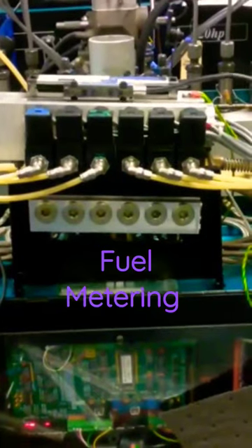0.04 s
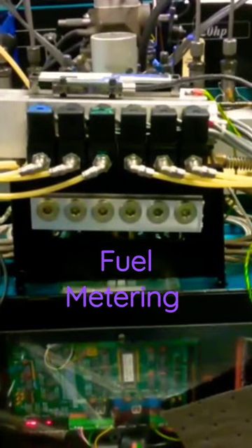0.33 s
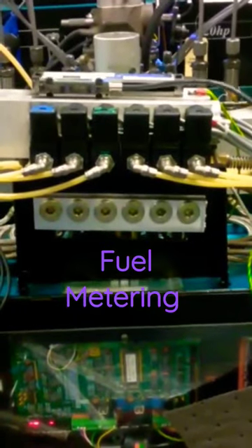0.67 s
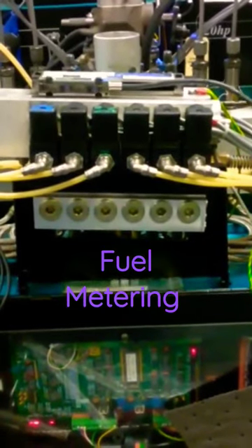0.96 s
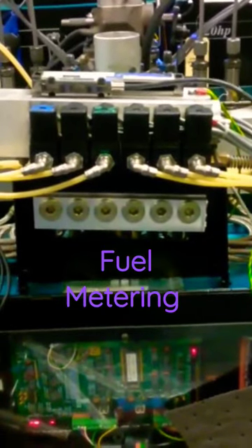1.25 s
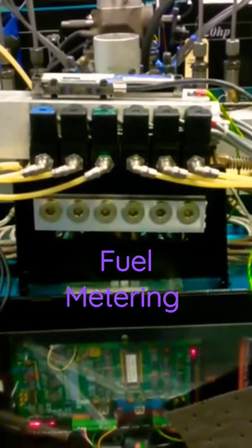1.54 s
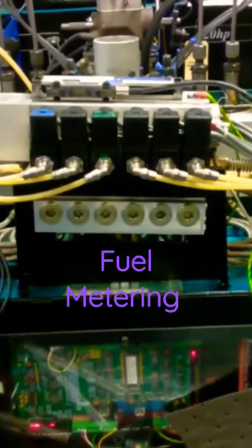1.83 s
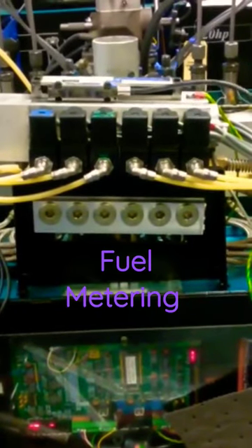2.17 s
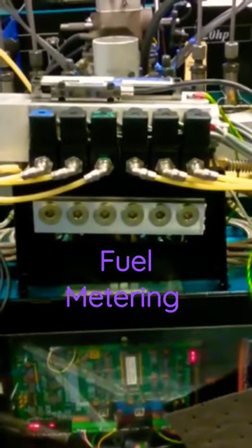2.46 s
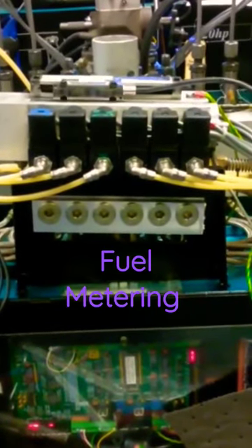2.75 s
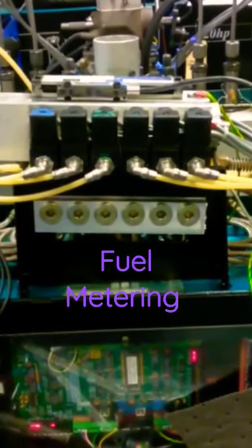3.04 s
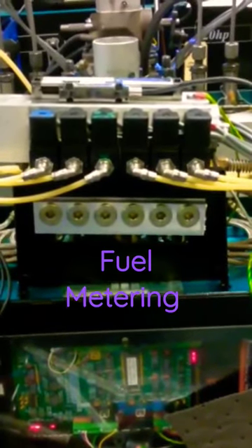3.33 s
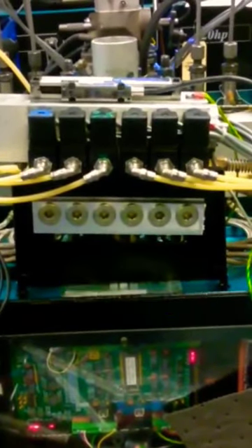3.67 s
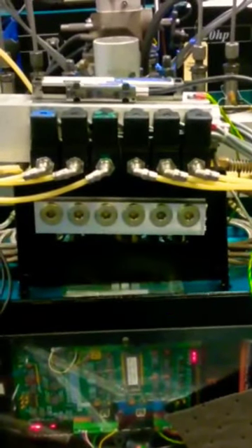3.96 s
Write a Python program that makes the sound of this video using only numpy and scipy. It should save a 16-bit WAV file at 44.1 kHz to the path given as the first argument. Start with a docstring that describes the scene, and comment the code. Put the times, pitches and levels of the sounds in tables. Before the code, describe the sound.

An engine runs at a constant speed on an indoor test stand, heard close up. Its drone carries a fast, repeating metallic clatter and a thin gear whine, over the low rush of the room.

```python
"""An engine's drone fades in, close by, at a governed 900 rpm on an indoor test stand.
Its crank orders and the whine of its gears are tones at fixed multiples of the shaft's speed.
The moving parts rattle at the same moments of every two-turn cycle, coloured by casing resonances
and a nearby reflection; play in the parts makes each cycle a little different.
Beneath lies the low rush of the test cell, and two faint, bright ticks sound over it."""
import sys
import numpy as np
from scipy import signal
from scipy.fft import rfft, irfft
from scipy.io import wavfile
from scipy.ndimage import uniform_filter1d

SR = 44100
rng = np.random.default_rng(int(sys.argv[2]) if len(sys.argv) > 2 else 0)


def store_wav(level_fs):
    """Save 16-bit WAV to argv[1]."""
    pcm = np.round(np.clip(np.atleast_2d(level_fs), -1, 1) * 32767)
    wavfile.write(sys.argv[1], SR, pcm.T.astype(np.int16))


N = 176400
T = np.arange(N) / SR
RPM = 900
CYCLE = round(SR * 120 / RPM)  # samples in one four-stroke cycle of two turns

# Partials of the drone: multiple_of_crank_speed, relative_level_db
CRANK_ORDERS = [(4, -56.5), (8, -52), (9, -53), (9.5, -49), (17, -43), (20, -42), (20.5, -41), (21, -41),
                (21.5, -45), (23, -51), (24, -33.5), (25, -46), (25.5, -51), (27.5, -50), (28.5, -44),
                (29, -41), (29.5, -47), (30, -49), (30.5, -47), (32, -49), (33, -52), (36, -52),
                (36.5, -46), (37, -51), (40, -44), (41, -52), (44.5, -54)]
# Partials of the gear whine: multiple_of_crank_speed, relative_level_db
GEAR_ORDERS = [(68, -50), (82.5, -42.5), (84, -47), (121, -46), (148, -47), (161, -47.5), (211.5, -53),
               (300.5, -48), (312.5, -46.5), (333.5, -51), (355, -48), (381.5, -48), (417, -47), (432, -48),
               (475.5, -48)]
# Rattles of the moving parts: time_in_cycle_ms, length_ms, centre_hz, width_hz, relative_strength_db
CYCLE_RATTLES = [(1, 12, 13000, 3500, 2), (3, 15, 4900, 600, 7), (6, 22, 9300, 700, 6),
                 (14, 10, 2120, 220, 7), (16, 10, 4600, 450, 8), (31, 15, 7000, 1100, 8),
                 (38, 8, 8850, 700, 6), (46, 15, 1280, 130, 7), (52, 8, 8750, 600, 4),
                 (56, 14, 2200, 170, 9), (56, 9, 3200, 400, 8), (58, 18, 4450, 600, 4),
                 (63, 8, 5600, 450, 3), (64, 10, 1060, 130, 7), (67, 10, 10600, 900, 6),
                 (72, 13, 2440, 200, 7), (79, 12, 1850, 220, 8), (80, 12, 8200, 600, 5),
                 (81, 14, 5700, 1200, 2), (91, 18, 1260, 130, 8), (98, 11, 5800, 1100, 6),
                 (99, 15, 2020, 140, 8), (101, 13, 2380, 260, 7), (101, 22, 3850, 450, 4),
                 (103, 8, 9650, 600, 4), (111, 9, 1500, 170, 9), (112, 12, 6400, 1700, 7.5),
                 (118, 11, 2390, 200, 8), (123, 12, 3250, 400, 5), (131, 10, 2210, 150, 7)]
# Spectral envelope of the repeating clatter: frequency_hz, relative_density_db
CLATTER_SPECTRUM = [(40, -35), (100, -25), (135, -4), (250, -3), (480, -2), (650, -11), (780, 0),
                    (830, -15), (950, -19), (1100, 2.5), (1250, -0.5), (1380, -2.5), (1500, 1.5),
                    (1700, -2.5), (1900, -3), (2050, 2), (2250, 0.5), (2500, -2), (2850, -5.5), (3100, -5),
                    (3500, -7), (4200, -3), (4800, -1.5), (5500, -1.5), (6300, 2.5), (7100, -1), (7900, -9),
                    (8500, -10), (9000, -8.5), (10700, -12.5), (11700, -23), (15500, -24)]
# Spectral envelope of the clatter that varies between cycles: frequency_hz, relative_density_db
LOOSE_SPECTRUM = [(700, -14), (950, -30), (1200, -4.5), (1450, -2), (1900, -11), (2200, -3.5), (2800, -5.5),
                  (3600, -7), (4600, -3), (5400, 0.5), (6300, -6), (7200, -2), (8300, -8), (9000, -2.5),
                  (9800, -3), (10700, -2.5), (11700, -12.5), (12700, -10.5), (14000, -14), (15500, -18)]
# Narrow peaks colouring the clatter, from casing resonances and the ripple of a nearby reflection:
# centre_hz, width_hz, boost_db
CLATTER_PEAKS = [(1240, 50, 4), (1815, 60, 3), (2040, 70, 3), (2220, 70, 4), (3170, 120, 4), (3450, 90, 5),
                 (3780, 90, 5), (4100, 110, 4), (4520, 50, 6), (4580, 40, 4), (4680, 45, 6), (5190, 60, 3),
                 (5340, 80, 4), (5715, 60, 4), (6075, 60, 4), (6265, 90, 6), (6478, 50, 4), (6755, 50, 4),
                 (7850, 60, 6), (8860, 80, 8), (9010, 90, 5), (10700, 130, 5), (12720, 200, 4)]
# Spectral envelope of the test cell's rush: frequency_hz, relative_density_db
CELL_SPECTRUM = [(20, -19), (42, -24), (58, -4), (72, -10), (105, -11), (135, -18), (160, 3.5), (200, -5),
                 (230, -8), (255, 4), (290, 0.5), (390, 1), (480, -4.5), (650, -9), (900, -6.5),
                 (3000, -70)]
# Ticks: start_s, relative_level_db
TICK_EVENTS = [(0.797, -26), (2.198, -34)]
# Fade-in, whose last gain holds to the end: time_s, gain_db
FADE_IN = [(0, -66), (.025, -31.5), (.05, -17.5), (.09, -7.5), (.15, -3), (.22, -2), (.3, -1.5)]


def undb(db):
    """Amplitude ratio of a level in decibels."""
    return 10 ** (np.asarray(db) / 20)


def level(x, db):
    """Signal scaled to an rms level."""
    return x * undb(db) / np.sqrt(np.mean(x ** 2))


def bell(offset, width):
    """Gaussian gain; width is the full width at half power."""
    return np.exp(-2 * np.log(2) * (offset / width) ** 2)


def spectral_gain(hz, spectrum):
    """Spectral envelope, interpolated in decibels over log frequency."""
    points_hz, db = np.array(spectrum).T
    return undb(np.interp(np.log(hz + 1), np.log(points_hz), db))


def noise(gain):
    """White noise filtered by gain(hz), at unit rms."""
    return level(irfft(rfft(rng.standard_normal(N)) * gain(np.fft.rfftfreq(N, 1 / SR)), N), 0)


def drift(corner_hz):
    """Low-pass noise: a smooth random fluctuation of unit rms."""
    return noise(lambda hz: 1 / (1 + (hz / corner_hz) ** 2) ** 2)


def swell(at_ms, length_ms):
    """One period of an envelope that rises and falls once per engine cycle."""
    cycle_ms = 1000 * CYCLE / SR
    ms = 1000 * np.arange(CYCLE) / SR
    return bell((ms - at_ms + cycle_ms / 2) % cycle_ms - cycle_ms / 2, length_ms)


def shaft_tones(orders, shaft_s, waver_db=.5):
    """Phase locking: each partial follows a multiple of the crank angle, wavering slightly in level."""
    turns = RPM / 60 * shaft_s
    out = np.zeros(N)
    for order, db in orders:
        amplitude = np.sqrt(2) * undb(db + waver_db * drift(5))
        out += amplitude * np.sin(2 * np.pi * (order * turns + rng.random()))
    return out


def crank_drone(shaft_s, even_s=.026):
    """Beating: neighbouring crank orders interfere. The strokes are even but for one heavier one."""
    partials = shaft_tones(CRANK_ORDERS, shaft_s)
    span = int(even_s * SR)
    power = uniform_filter1d(uniform_filter1d(partials ** 2, span), span // 2)
    even = partials * np.sqrt(power.mean() / power)  # only the quick beats remain
    accent_db = 2 * np.resize(swell(at_ms=102, length_ms=20), N)
    return undb(.7 + accent_db) * even


def gear_whine(shaft_s):
    """Gear meshing: teeth engage periodically, sounding high multiples of the crank speed."""
    return undb(3.5) * shaft_tones(GEAR_ORDERS, shaft_s)


def peak_gain(hz):
    """Resonance and interference: the casing and a nearby reflection add narrow peaks to the clatter."""
    return undb(sum(db * bell(hz - centre_hz, width_hz) for centre_hz, width_hz, db in CLATTER_PEAKS))


def repeating_clatter(shaft_s, scatter_db=1.5, even_ms=8.5):
    """Periodic excitation: a cycle of metallic chatter, swelling at each rattle, follows the shaft."""
    hz = np.fft.rfftfreq(CYCLE, 1 / SR)
    phases = np.exp(2j * np.pi * rng.random(len(hz)))
    contacts = phases * undb(scatter_db * rng.standard_normal(len(hz)))
    bands_hz = np.geomspace(60, 16000, 44)
    span = int(even_ms * SR / 1000)
    chatter = np.zeros(CYCLE)
    for share, band_hz in zip(np.eye(len(bands_hz)), bands_hz):
        band = np.fft.ifft(contacts * np.interp(hz, bands_hz, share), CYCLE)  # analytic signal
        power = uniform_filter1d(np.abs(band) ** 2, span, mode="wrap")
        even = band.real * np.sqrt(power.mean() / power)
        rattle_power = 1 + sum(
            (undb(db - .5) * swell(at_ms, length_ms) * bell(band_hz - centre_hz, width_hz)) ** 2
            for at_ms, length_ms, centre_hz, width_hz, db in CYCLE_RATTLES)
        chatter += even * np.sqrt(rattle_power / rattle_power.mean())
    fine = 8 * CYCLE  # oversampling keeps the treble through interpolation
    cycle = irfft(rfft(chatter) * spectral_gain(hz, CLATTER_SPECTRUM) * peak_gain(hz), fine)
    cycle_position = shaft_s * SR / CYCLE % 1
    return level(np.interp(cycle_position, np.arange(fine) / fine, cycle), -25.6)


def loose_clatter():
    """Modulated noise: with play in the parts, the rattles keep their timing but not their waveform."""
    hz = np.fft.rfftfreq(N, 1 / SR)
    chatter = rng.standard_normal(N)
    contacts = rfft(rng.standard_normal(N))
    for at_ms, length_ms, centre_hz, width_hz, db in CYCLE_RATTLES:
        band = irfft(contacts * bell(hz - centre_hz, width_hz), N)
        chatter += undb(db - .5) * np.resize(swell(at_ms, length_ms), N) * band
    coloured = irfft(rfft(chatter) * spectral_gain(hz, LOOSE_SPECTRUM) * peak_gain(hz), N)
    return level(coloured, -30.7)


def cell_rush():
    """Stationary noise: the test cell's steady rush, strongest at low frequencies."""
    return level(noise(lambda hz: spectral_gain(hz, CELL_SPECTRUM)), -36)


def ticks(centre_hz=9900, width_hz=7700, decay_s=.003, tail_s=.04, tail_db=-8.5):
    """Exponential decay: each burst of bright noise dies quickly, its tail in the room more slowly."""
    envelope = np.zeros(N)
    for start_s, db in TICK_EVENTS:
        age_s = np.maximum(T - start_s, 0)
        direct = np.exp(-age_s / decay_s)
        room_tail = undb(tail_db) * np.exp(-age_s / tail_s)
        envelope += undb(db) * (T > start_s) * (direct + room_tail)
    return envelope * noise(lambda hz: bell(hz - centre_hz, width_hz))


def scene():
    """Superposition: engine, cell and ticks add, the same in both channels."""
    shaft_s = T + 3e-5 * drift(1.5) + 6e-6 * drift(56)  # shaft time wanders slowly and shakes quickly
    engine = crank_drone(shaft_s) + gear_whine(shaft_s) + repeating_clatter(shaft_s) + loose_clatter()
    mono = engine + cell_rush() + ticks()
    return np.array([mono, mono])


def record(dry, cutoff_hz=15500):
    """Gain and filtering: the sound fades in, and a steep low-pass removes the highest treble."""
    fade_db = np.interp(T, *np.array(FADE_IN).T)
    lowpass = signal.ellip(10, .2, 80, cutoff_hz, fs=SR, output="sos")
    return signal.sosfilt(lowpass, dry * undb(fade_db))


dry = scene()
out = record(dry)
store_wav(out)
```